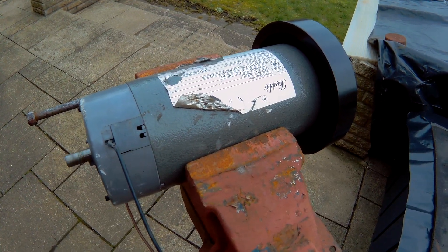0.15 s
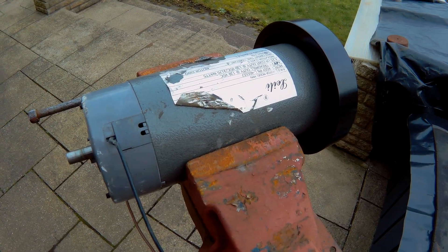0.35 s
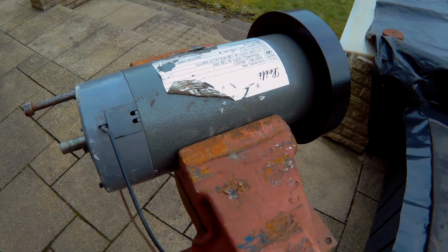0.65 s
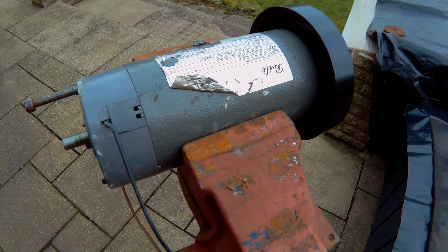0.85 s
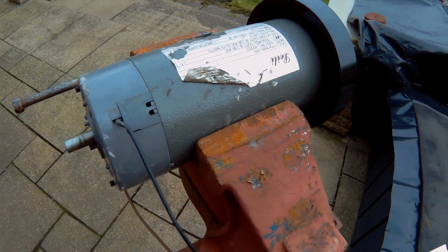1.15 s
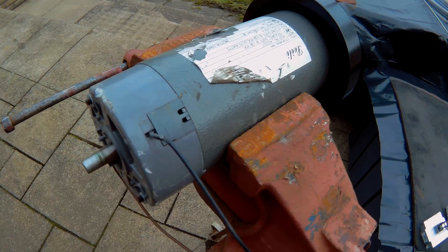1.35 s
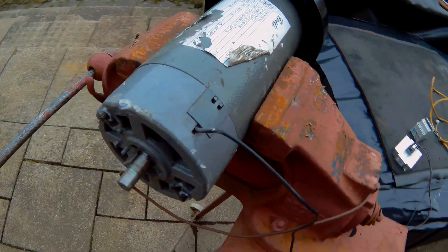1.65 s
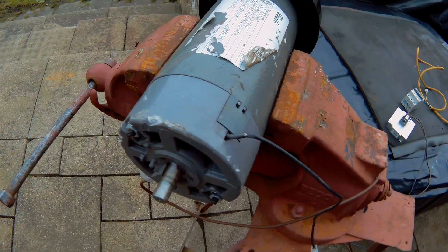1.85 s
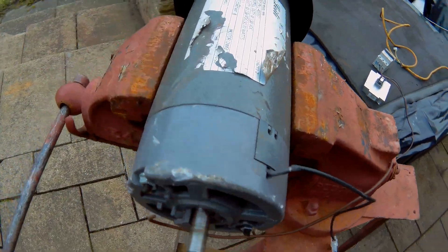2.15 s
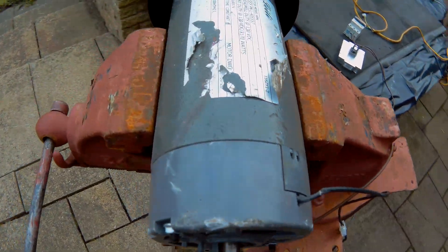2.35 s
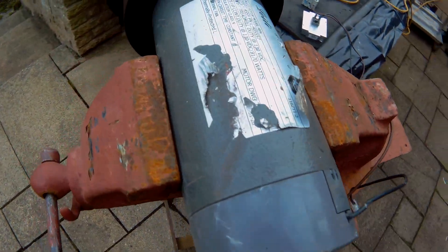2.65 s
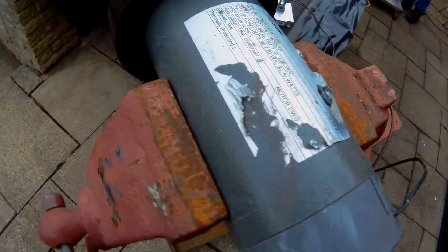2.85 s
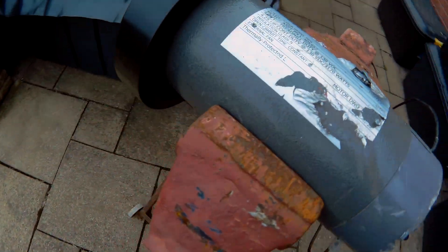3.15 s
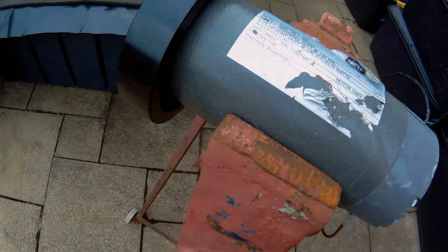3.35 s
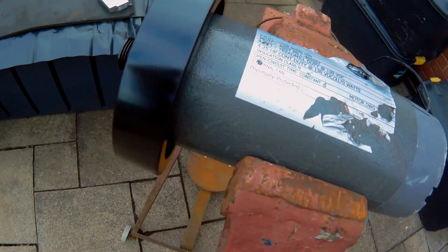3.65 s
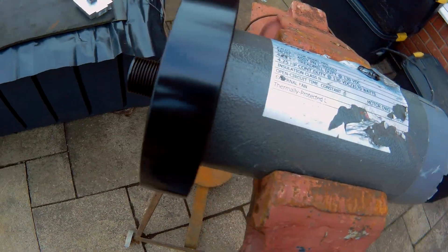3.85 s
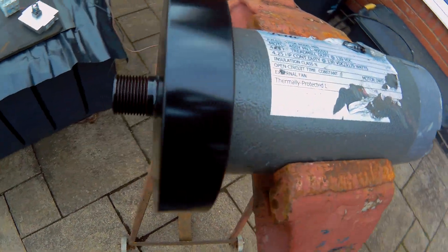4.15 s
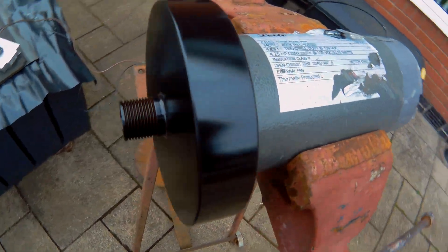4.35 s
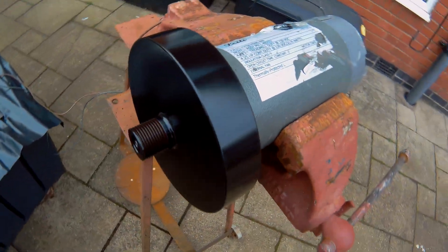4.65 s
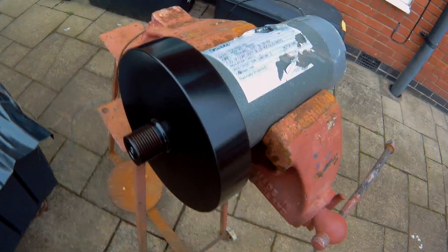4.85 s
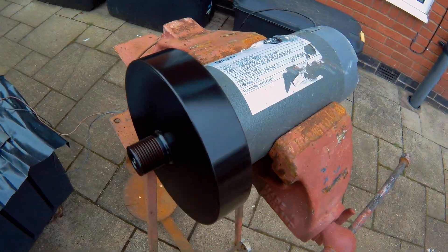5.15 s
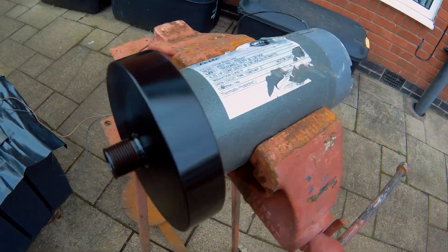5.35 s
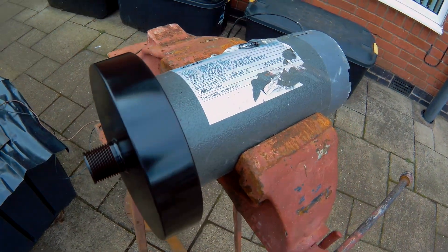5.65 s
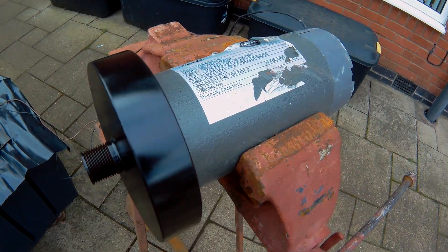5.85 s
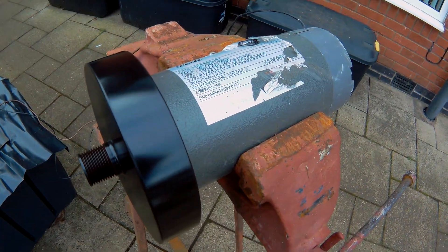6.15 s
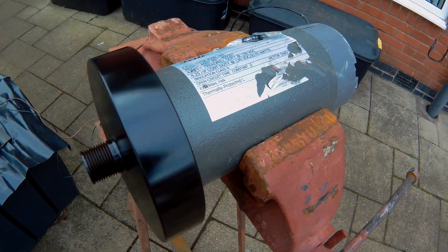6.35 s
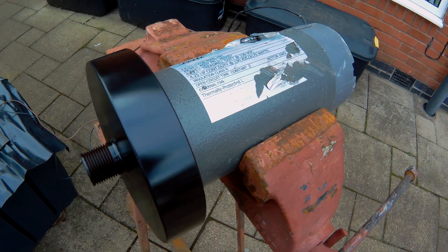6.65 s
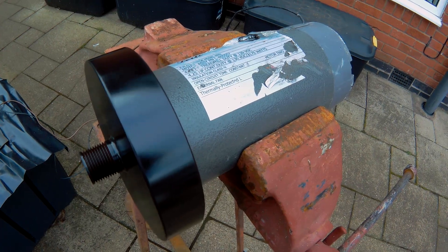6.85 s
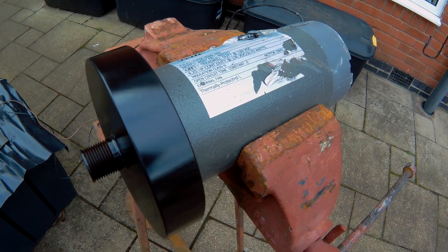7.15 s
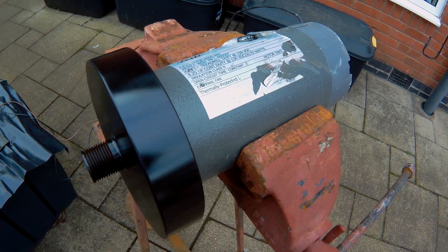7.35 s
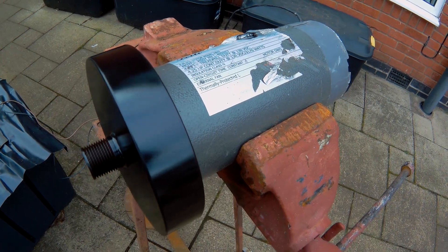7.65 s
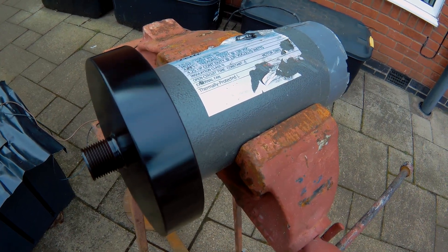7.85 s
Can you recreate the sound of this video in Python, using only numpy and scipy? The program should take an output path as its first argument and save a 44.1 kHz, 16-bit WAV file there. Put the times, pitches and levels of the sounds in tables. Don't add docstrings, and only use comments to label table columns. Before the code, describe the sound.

Close up, a worn electric motor accelerates for eight seconds, buzzing and hissing, with sharp rim ticks midway and wind buffeting the microphone afterwards.

```python
import sys
import numpy as np
from scipy import signal
from scipy.fft import rfft, irfft, next_fast_len
from scipy.io import wavfile
from scipy.ndimage import map_coordinates

SR = 44100
rng = np.random.default_rng(int(sys.argv[2]) if len(sys.argv) > 2 else 0)


def boost(x):
    u = np.asarray(x, float) / 20
    return 10 ** u


def unload_wav(signal):
    wavfile.write(
        sys.argv[1],
        SR,
        np.round(np.clip(np.atleast_2d(signal).T, -1, 1) * 32767).astype(np.int16),
    )


N = 352800
TIME = np.arange(N) / SR
SLOTS = 16

# time_s, speed_turns_per_s
SHAFT_SPEED = [(0.0, 26.55), (0.24, 28.2), (0.54, 30.1), (0.72, 31.9), (1.2, 38.18), (1.56, 42.34),
               (1.8, 44.85), (2.28, 48.7), (2.6, 50.71), (2.9, 53.1), (3.4, 58.15), (3.7, 60.75),
               (4.1, 63.85), (4.5, 67.6), (5.3, 74.03), (5.9, 78.05), (7.1, 84.79), (8.0, 89.29)]
# time_s, end_bell_level_db, barrel_over_bell_db, bearing_play_db
VIEW = [(0, -34.5, -6.5, 3), (.7, -32, 0, 1), (1.2, -34.5, 4, 3), (1.65, -32.5, 3.5, 3.5),
        (1.83, -33, 6, -1), (2.45, -28, 4, -2), (2.8, -32.5, 5, 2.5), (3.05, -32, 4.5, 4),
        (3.3, -32.5, 2.5, 4), (3.7, -31, 2.5, 1.5), (4.3, -31.5, 2.5, 2), (4.97, -41, 9, 2.5),
        (5.4, -40.5, 6.5, 1.5), (5.9, -35, 3.5, 3), (6.2, -33, -0.5, 4.5), (6.7, -36.5, 4.5, 0.5),
        (7.4, -35.5, -1, 7.5), (8, -33, -2, 3)]


def unit(x):
    return x / np.sqrt(np.mean(x ** 2) + 1e-20)


def curves(rows):
    s, *columns = np.transpose(rows)
    return [np.interp(TIME, s, column) for column in columns]


def wobble(rate, depth_db=None):
    coarse = TIME[::32]
    knots = rng.standard_normal(int(N * rate / SR) + 4)
    curve = map_coordinates(knots, [coarse * rate])
    if depth_db is not None:
        curve = boost(depth_db * curve)
    return np.interp(TIME, coarse, curve)


def swell(s, half_s):
    return np.exp(-((TIME - s) / half_s) ** 2)


def throb(cycles, depth):
    return 1 + depth * np.cos(2 * np.pi * cycles)


def filtered(x, response):
    m = next_fast_len(N + SR // 2)
    spectrum = rfft(x, m) * response(np.fft.rfftfreq(m, 1 / SR))
    return irfft(spectrum, m)[..., :N]


def modes(table):
    def response(f):
        total = 0
        for k, (centre, width, db) in enumerate(table):
            damping = 1j * f * width
            total = total + (-1) ** k * boost(db) * damping / (centre * centre - f * f + damping)
        return total
    return response


def shape(points):
    hz, db = np.transpose(points)
    return lambda f: boost(np.interp(np.log(f + 1), np.log(hz + 1), db))


def knocks(cycles, levels, unsteady_db, behind=0, scatter=0):
    step = np.exp(2j * np.pi * cycles)
    wave = np.exp(-2j * np.pi * behind)
    force = 0
    for db in levels:
        wave = wave * step
        phase = np.exp(2j * np.pi * scatter * rng.random())
        force = force + wobble(3.95, unsteady_db) * (boost(db) * phase * wave).real
    return force


def pulses(s, size):
    at = s[:, None] * SR
    near = np.floor(at).astype(int) + np.arange(-8, 8)
    taps = np.sinc(near - at) * np.cos(np.pi * (near - at) / 16) ** 2
    return np.bincount(np.clip(near, 0, N - 1).ravel(), (size[:, None] * taps).ravel(), N)


def ring(table, rolling, rolling_db, knock, knock_db):
    rumble, rap = filtered(np.array([rolling, knock]), modes(table))
    return (boost(rolling_db) * rumble + boost(knock_db) * rap) / np.std(rumble)


def bearings(turns):
    # centre_hz, width_hz, level_db
    end_bell = [(900, 32, 0.5), (1047, 58, 0), (1348, 76, -3), (1707, 260, 0), (1877, 140, 8),
                (1987.4, 69.4, 10.5)]
    barrel = [(2376, 60, 1), (2511, 33, -0.5), (2689, 66, 7.5), (2886, 124, 7.5), (3067, 168, 1)]
    dent = [-30, -30, -8, -8, 4, 3, 1, 0.5, 5, 4, 1.5, 0, -4, 0, -1.5, -0.5, -2, 0, -13, -5, -10, -4, 0]
    lagging = [-30, -30, -30, -30, -19.5, -12, -2.5, -4.5, -10, -5.5, -5, -0.5, -1, -3.5, -7.5, 1, -3, 1.5,
               -9, -14, -9.5]
    pit = [-30, -30, -28, -23, -3, -29, 8.5, 5.5, 3, 1.5, 2]
    # centre_s, half_length_s, bell_gain_db, barrel_gain_db
    chatter = [(.7, 0.27, -0.5, -6), (1.22, 0.16, 5.5, -1), (2.3, .15, 5.5, -1), (3.74, 0.13, 1, 4.5),
               (4.318, 0.21, 2, 2.5), (5.2, 0.28, 2.5, 5.5), (3.068, 0.04, -7, 5.5), (3.295, 0.2, 5, 0.5),
               (3.525, 0.065, 0.5, 5.5), (3.986, 0.11, 4.5, -0.5), (4.97, 0.31, 8, -2),
               (5.6, 0.15, 8.5, 2.5), (6.208, 0.22, 12, -1.5), (7.2, 0.39, 8.5, 0.5), (7.7, 0.33, 8.5, 2)]
    race_rate, spin_rate = 4.9056, 4.0937
    passes = race_rate * turns
    cage = race_rate / 8 * turns + .03

    bell_db, side_db, play_db = curves(VIEW)
    barrel_db = bell_db + side_db
    bell_knock_db = bell_db + play_db
    barrel_knock_db = barrel_db - 2.5 + 0.58 * play_db
    for s, half_s, bell_gain_db, barrel_gain_db in chatter:
        spell = swell(s, half_s)
        bell_knock_db = bell_knock_db + bell_gain_db * spell
        barrel_knock_db = barrel_knock_db + barrel_gain_db * spell

    beat = .33 - 0.06 * TIME
    uneven = throb(cage, beat) * throb(turns, .2)
    late = -.003 * np.sin(2 * np.pi * cage)
    race = knocks(passes + late, dent, unsteady_db=1.5)
    race = race + knocks(passes, lagging, unsteady_db=0.0, behind=cage, scatter=0.99)
    race = uneven * wobble(30, 1.0) * unit(race)
    knock = race + boost(-7) * unit(knocks(spin_rate * turns, pit, unsteady_db=1.6))

    rolling = rng.standard_normal(N) * throb(cage, beat / 2) * throb(passes, .35)
    speed = curves(SHAFT_SPEED)[0]
    full_speed = 62
    roll_db = -3 * np.clip((full_speed - speed) / (full_speed - speed[0]), 0, 1) ** .5

    bell_sound = ring(end_bell, rolling, bell_db + roll_db + 0.73, knock, bell_knock_db - 12.5)
    barrel_sound = ring(barrel, rolling, barrel_db + roll_db - 5.5, knock, barrel_knock_db - 7.5)
    return bell_sound + barrel_sound


def slots(turns):
    pull_levels = [0, -5, -9]
    pull = unit(knocks(SLOTS * turns, pull_levels, unsteady_db=1.5))
    frame = shape([(400, -24), (780, -16), (900, 2), (1100, -3), (1250, -2), (1350, 5), (1500, 1),
                   (2600, -2), (4000, -14)])
    return boost(-40.0) * filtered(pull, frame)


def brushes(turns):
    # time_s, rub_db, arcing_db
    brush_view = [(0, -42.5, -60), (.47, -41, -59), (1.07, -38.5, -50.5), (1.33, -38.5, -53),
                  (1.58, -37, -46), (2.36, -34, -45), (2.96, -31, -46.5), (3.39, -34.5, -44.5),
                  (3.75, -35, -50), (4.39, -37.5, -46), (5.26, -37, -48.5), (5.97, -36.5, -48),
                  (6.3, -32.5, -43), (6.6, -34.5, -46), (8, -35.5, -45)]
    # time_s, level_db
    facing_away = [(0, 4), (3.1, 4), (3.5, -7), (8, -14)]
    # time_s, level_db
    cover_view = [(0, -50.5), (1.2, -49), (1.5, -57), (8, -61)]
    # centre_hz, width_hz, level_db
    cap_modes = [(4020, 630, -2), (4880, 420, 0), (5820, 1240, -8.5), (7130, 400, -8), (7660, 430, -10.5)]
    holder_modes = [(10250, 2400, -1.5), (13100, 1300, -7), (15100, 610, -17)]
    # start_s, peak_db
    big_sparks = [(0.8694, -31), (1.1887, -28), (1.4292, -28), (1.4491, -26), (1.4895, -25), (1.5684, -26),
                  (1.6093, -34), (1.6097, -19), (1.639, -21), (1.679, -28), (1.7085, -24), (1.73, -22),
                  (1.7689, -44), (1.7689, -25), (1.8193, -23), (1.8497, -27), (1.8896, -38), (1.8903, -19),
                  (1.9305, -28), (2.0104, -27), (2.0198, -25), (2.0602, -23), (2.1994, -23), (2.7811, -25),
                  (3.3588, -25), (3.914, -26), (4.7835, -31), (4.941, -28)]

    rub_db, fizz_db = curves(brush_view)
    facing_db = curves(facing_away)[0]
    cap_ring, holder_ring = modes(cap_modes), modes(holder_modes)
    holder_tilt = shape([(11000, 0), (11700, -13), (12600, -8), (13300, 1.5)])

    def cap(f):
        return cap_ring(f) + 0.03 * (f > 3000) * (f < 9000)

    def holder(f):
        return holder_ring(f) ** 2 * holder_tilt(f)

    gate = throb(SLOTS * turns, 0.52) * throb(turns, 0.14) * boost(0.92 * wobble(60))
    rub = unit(filtered(gate * rng.standard_normal(N), cap))
    flicker = boost(1.3 * wobble(300) + 1.1 * wobble(8))
    fizz = unit(filtered(gate * flicker * rng.standard_normal(N), holder))
    cover = unit(filtered(gate * rng.standard_normal(N), modes([(6980, 140, 0)])))

    bar = np.arange(1, int(turns[-1] * SLOTS))
    height, offset = rng.standard_normal((2, SLOTS))[:, bar % SLOTS]

    def edge(lag):
        moments = np.interp(bar + lag + .019 * offset, turns * SLOTS, TIME)
        return pulses(moments, boost(3 * height))

    clicks = edge(0) + .8 * edge(.15)
    clicks = unit(filtered(clicks, lambda f: np.sqrt(cap(f)) * (f > 3300) * (f < 9000)))

    crest = np.arange(.0093, N / SR - .01, 1 / 100)
    luck = rng.standard_normal((len(crest), 2))
    small = pulses(crest + .0004 * luck[:, 0], boost(4 * luck[:, 1]))
    s, db = np.transpose(big_sparks)
    big = pulses(s, boost(db + 20.5))
    small_db = fizz_db + 32.5 + facing_db / 2 - 5
    crackle = boost(-60 * TIME[:300] / 0.012) * rng.standard_normal(300)
    sparks = signal.fftconvolve(boost(small_db) * small + big, crackle / 3.9)[:N]
    sparks = filtered(sparks, lambda f: holder(f) * (1 + 0.74 * (f > 12800)) + .15 * cap_ring(f))

    sound = boost(rub_db - 5 - 0.079 * facing_db) * rub
    sound = sound + boost(fizz_db - 3) * fizz
    sound = sound + boost(rub_db - 10.5 + facing_db) * wobble(4.07, 2.2) * clicks
    return sound + sparks + boost(curves(cover_view)[0]) * cover


def fan(turns):
    # frequency_hz, density_db_per_hz
    roar_spectrum = [(24, -45), (40, -30), (166, -8.5), (385, -6.5), (538, -5), (611, 1), (1190, -2.5),
                     (1740, -1.5), (1980, -7), (2240, -13), (2880, -12), (3340, -14), (4570, -15),
                     (6000, -25.5), (7800, -54), (13200, -120)]
    # centre_hz, width_hz, level_db
    cavities = [(538, 18.6, 13), (608, 20, 6.5), (843, 23, 8)]
    # frequency_hz, density_db_per_hz
    draught_spectrum = [(8.8, -31), (15, -1), (61, 5), (200, -5), (260, -26), (440, -120)]
    imbalance = [
        0,
        0.94,
        0,
    ]
    # centre_s, peak_db, half_length_s
    gusts = [(2.81, -60, .05), (3.104, -46, 0.059), (3.27, -40.5, 0.088), (3.58, -41, 0.13),
             (3.978, -42, 0.033), (4.133, -40, 0.055), (5.88, -48, .1), (6.4, -59, 0.17),
             (6.85, -41, 0.072), (7.02, -43, 0.11), (7.402, -46, 0.11), (7.614, -43, .07),
             (7.81, -36, 0.022), (7.937, -49, .06)]

    speed, level_db = curves(SHAFT_SPEED)[0], curves(VIEW)[0]
    growth_db = 2.228 * 20 * np.log10(speed / speed[0])
    roar_db = -48.5 + growth_db + 0.05 * (level_db - level_db[0])
    facing = (1 + np.tanh((TIME - 3.3) / 0.16)) / 2

    cavity_ring, air = modes(cavities), shape(roar_spectrum)
    roar = boost(1.15 * wobble(9)) * rng.standard_normal(N)
    roar = unit(filtered(roar, lambda f: air(f) * (1 + np.abs(cavity_ring(f)) * 0.37)))

    shake_db = -59.5 + 8.5 * facing + 1.3 * wobble(4)
    shake = 0
    for k, db in enumerate(imbalance):
        shake = shake + boost(db + 1.8 * wobble(2.2)) * np.sin(2 * np.pi * (k + 1) * turns)

    calm_db, windy_db = -64, -54
    blow = boost(calm_db + facing * (windy_db - calm_db + 2.2 * wobble(6.7)))
    for s, db, half_s in gusts:
        blow = blow + boost(db) * swell(s, half_s)
    draught = boost(1.8 * wobble(15)) * rng.standard_normal(N)
    draught = unit(filtered(draught, shape(draught_spectrum)))
    return boost(roar_db + 2.5) * roar + boost(shake_db + roar_db + 29.5) * shake + blow * draught


def hum():
    # frequency_hz, level_db
    supply = [(48.4, -69), (199.2, -67)]
    sound = 0
    for hz, db in supply:
        sound = sound + boost(db + 3 + 0.81 * wobble(2.65)) * np.sin(2 * np.pi * hz * TIME)
    return sound


def ticks():
    # start_s, peak_db, pitch_hz, overtone_db
    rattles = [(3.5099, -23, 4020, -24), (3.5438, -21, 3970, -25), (3.5657, -19, 4160, -24),
               (3.6326, -21, 4270, -15), (3.6745, -19, 3890, -22), (3.699, -14, 4220, -21),
               (3.7309, -18, 3910, -21), (3.767, -13, 4130, -26), (3.8591, -20, 4180, -25),
               (3.878, -17.5, 4320, -18), (3.912, -15.5, 4480, -19), (3.9543, -20, 3920, -28),
               (3.9754, -15, 4330, -19), (3.9918, -16, 4260, -22), (4.0397, -16, 4370, -20),
               (4.082, -18, 3700, -28), (4.101, -10.5, 4230, -27), (4.1314, -20, 4420, -21),
               (4.1646, -15, 4140, -20), (4.2876, -29, 4200, -22), (4.3305, -27, 4300, -10)]
    out, t = np.zeros(N), TIME[:300]
    overtones = np.sin(2 * np.pi * 7000 * t) + np.sin(2 * np.pi * 10000 * t)
    for s, db, hz, over_db in rattles:
        tone = np.sin(2 * np.pi * hz * t) + boost(over_db + 7.5) * overtones
        envelope = boost(db + 3 - 60 * t / .009) * (1 - np.exp(-t / .0006))
        out[round(s * SR):][:len(t)] += envelope * tone
    return out


def scene():
    turns = np.cumsum(curves(SHAFT_SPEED)[0]) / SR
    mix = bearings(turns) + slots(turns) + brushes(turns) + fan(turns) + hum() + ticks()
    return mix[None]


def low_pass(x):
    return signal.sosfilt(signal.butter(12, 15750, fs=SR, output="sos"), x)


def record(dry):
    limited = filtered(dry, lambda f: f < 15750)
    return low_pass(limited)


dry = scene()
out = record(dry)
unload_wav(out)
```